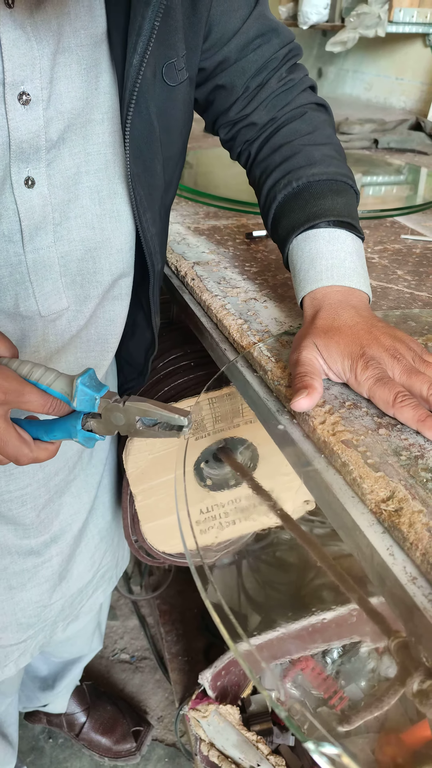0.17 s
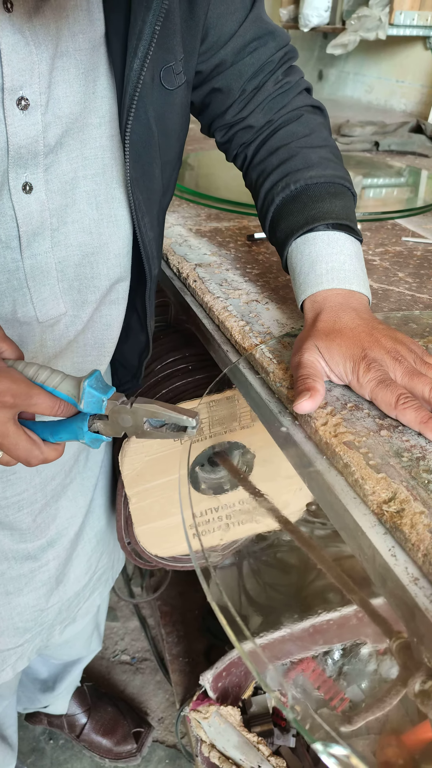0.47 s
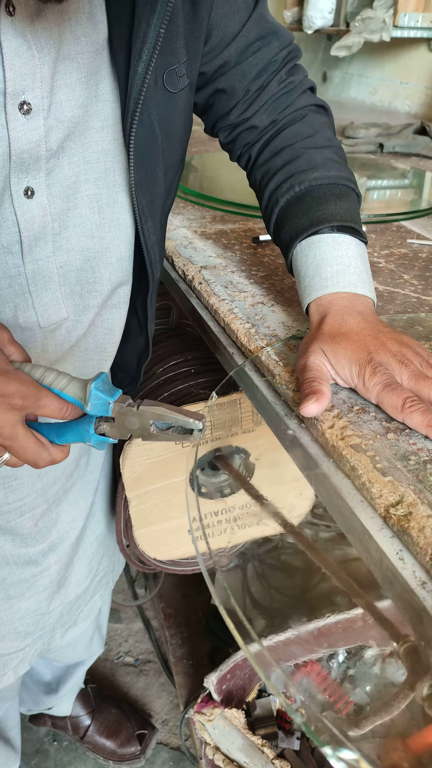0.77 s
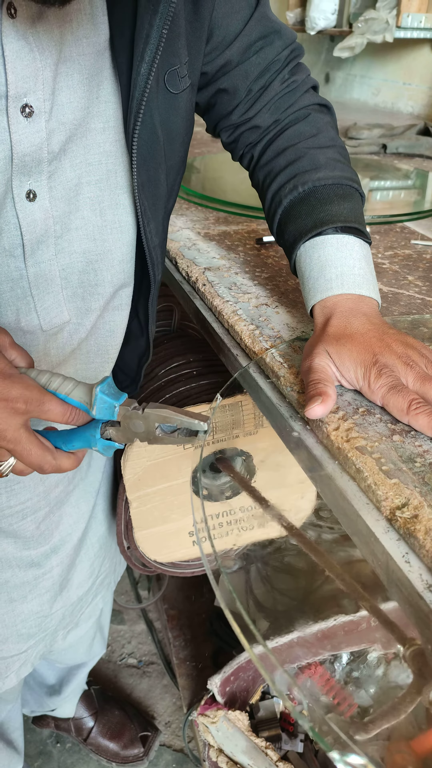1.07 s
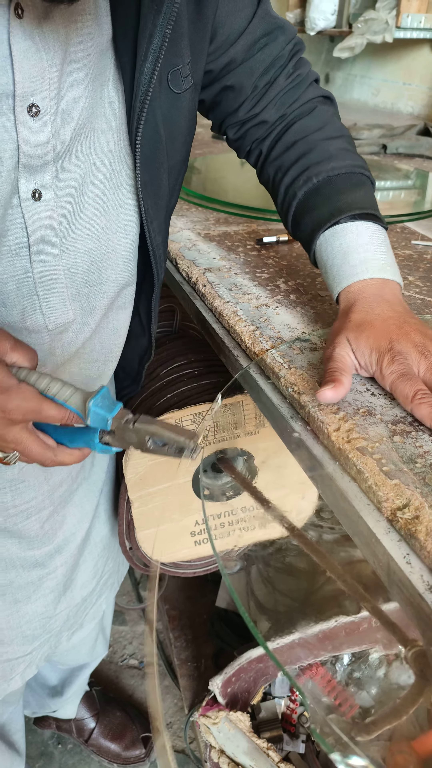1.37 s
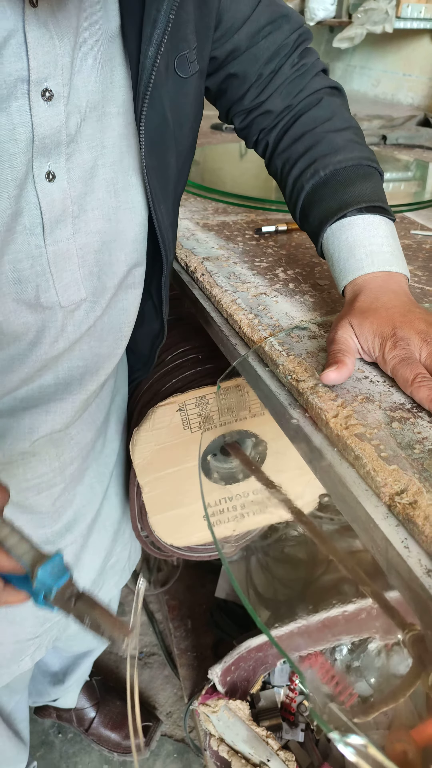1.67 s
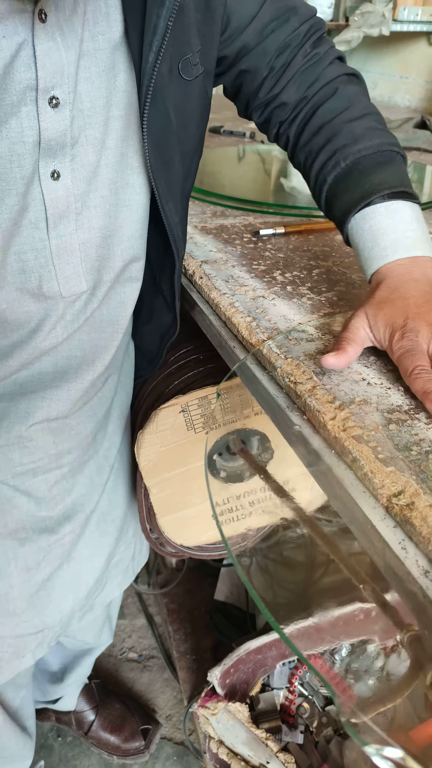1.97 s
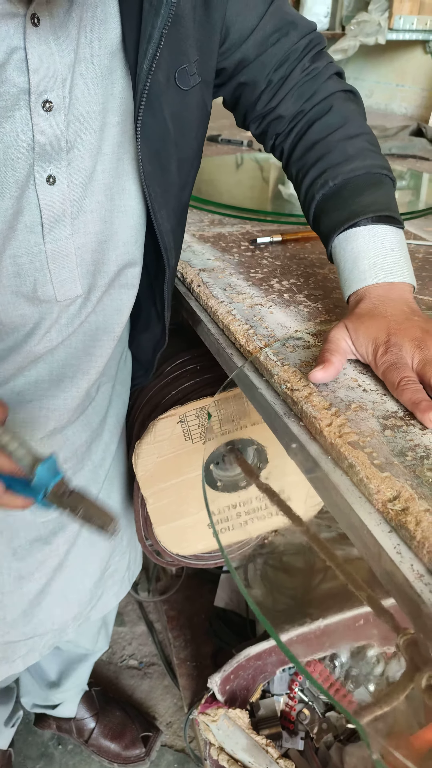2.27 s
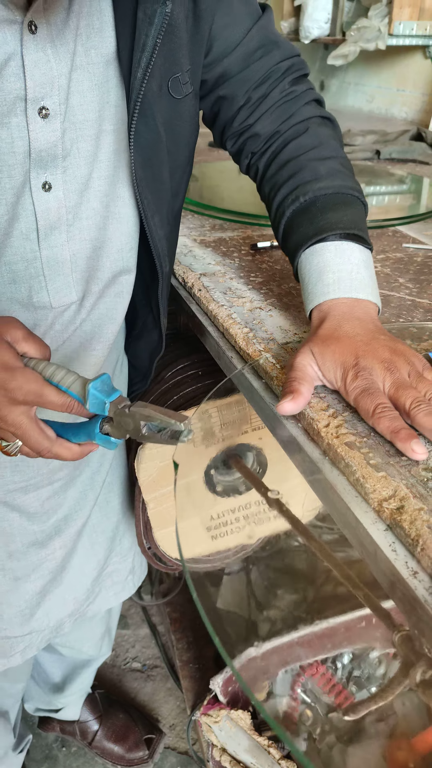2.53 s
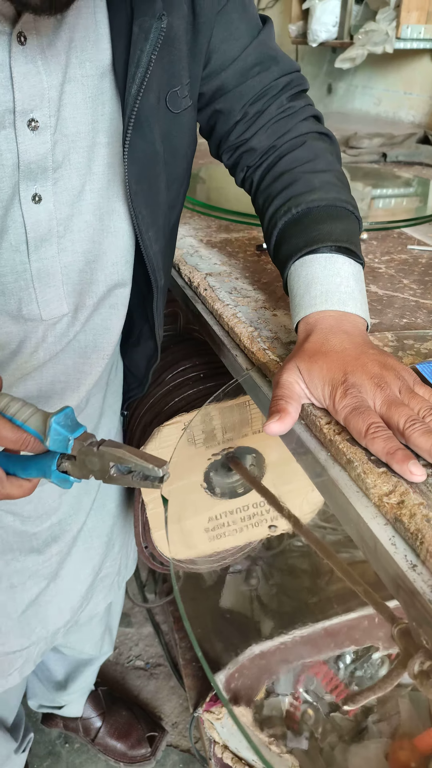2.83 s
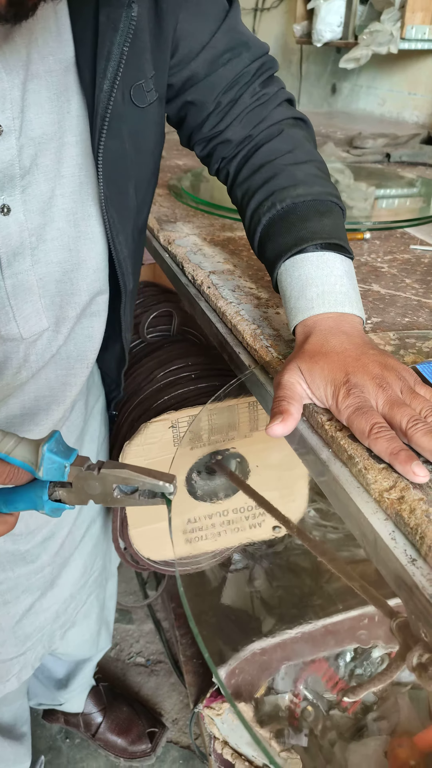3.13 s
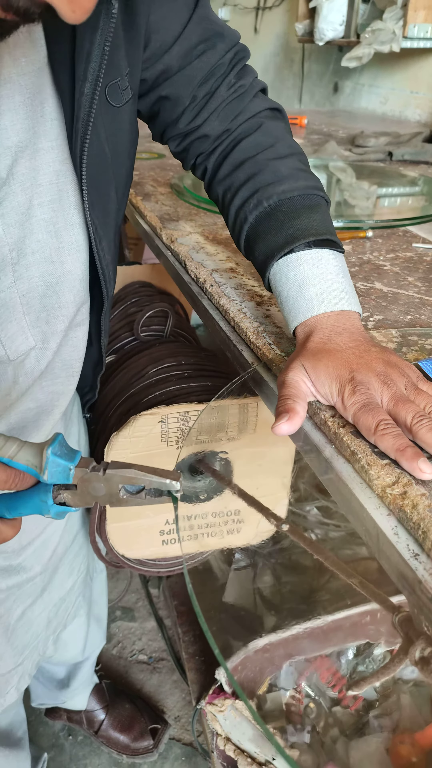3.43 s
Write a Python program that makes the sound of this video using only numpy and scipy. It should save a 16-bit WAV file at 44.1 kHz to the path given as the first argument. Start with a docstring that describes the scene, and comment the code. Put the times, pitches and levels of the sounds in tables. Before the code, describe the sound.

A glass sheet cracks loudly under pliers, and the broken strip falls and clinks ringing nearby

```python
"""Snapping a strip off a glass sheet

Pliers tick on the edge of a glass sheet and snap a long strip off with a crack: bursts of gritty noise.
The strip falls to the right and clinks on a hard floor: ringing modes, struck at each touch of the floor.
The pliers bite the edge again. Echoes of noise make the open workshop; street rumble, hiss and a drone
fill it. A gain control turns the sound down after loud blows."""
import sys
import numpy as np
from scipy import signal
from scipy.fft import rfft, irfft, next_fast_len
from scipy.io import wavfile
from scipy.ndimage import uniform_filter1d, map_coordinates

SR = 44100
rng = np.random.default_rng(int(sys.argv[2]) if len(sys.argv) > 2 else 0)


def wrap_up_sound(samples):
    """Save the sound to the file named by the first command line argument, as 16-bit audio."""
    columns = np.atleast_2d(samples).T
    # keep every value between -1 and 1, then stretch to whole-number steps
    tamed = np.clip(columns, -1, 1)
    steps = np.round(tamed * 32767).astype(np.int16)
    wavfile.write(sys.argv[1], SR, steps)


N = 158760
RISE_S = 0.0013  # how fast a blow swells

# Pitches of the strip's modes: (frequency [Hz])
STRIP_MODES_HZ = [1465, 2875, 4690, 6870, 9405, 12240, 12530, 3698, 5525, 6430, 7660, 10170, 11350, 13070]


def amp(db):
    """Turn decibels into a plain factor."""
    return 10 ** (np.asarray(db) / 20)


def unit(x):
    """Scale to an rms of 1."""
    return x / np.sqrt(np.mean(x ** 2) + 1e-20)


def along(points, hz):
    """Read a curve of (frequency [Hz], value) points on a log frequency axis."""
    f, v = np.transpose(points)
    return np.interp(np.log(hz + 1), np.log(f + 1), v)


def wobble(rate, count=N):
    """A smooth random curve through `rate` random points a second."""
    knots = rng.standard_normal(int(count * rate / SR) + 4)
    return map_coordinates(knots, [np.arange(count) * rate / SR])


def filtered(x, response):
    """Multiply the spectrum of x by a response that depends on frequency."""
    m = next_fast_len(N + SR // 2)
    hz = np.fft.rfftfreq(m, 1 / SR)
    return irfft(rfft(x, m) * response(hz), m)[..., :N]


def rush(spectrum, alike):
    """Stereo noise of rms 1; a shared middle and an opposed side part set how alike left and right are."""
    def response(hz):
        turn = np.arccos(np.clip(along(alike, hz), -1, 1)) / 2
        return amp(along(spectrum, hz)) * [np.cos(turn), np.sin(turn)]

    mid, side = filtered(rng.standard_normal((2, N)), response)
    return unit(np.array([mid + side, mid - side]))


def split(x):
    """Low and high part, parted softly around 5970 Hz; together they give x again."""
    low = filtered(x, lambda hz: 1 / (1 + (hz / 5970) ** 4))
    return low, x - low


def burst(s, t60):
    """Envelope of a blow at s seconds: a quick rise, then a fall of 60 dB in t60 seconds."""
    u = np.maximum(np.arange(N) / SR - s, 0)
    return (1 - np.exp(-u / RISE_S)) * amp(-60 * u / t60)


def modes(x, centres_hz, width_hz):
    """x ringing in narrow resonances, added with alternating sign."""
    def response(f):
        total = 0
        for k, hz in enumerate(centres_hz):
            total = total + (-1) ** k * 1j * f * width_hz / (hz * hz - f * f + 1j * f * width_hz)
        return total

    return filtered(x, response)


def pings(rows, t60):
    """One dying sine tone for each (time [s], level [dB], frequency [Hz]) row."""
    t = np.arange(N) / SR
    return sum(amp(db) * burst(s, t60) * np.sin(2 * np.pi * hz * (t - s)) for s, db, hz in rows)


def pliers():
    """Glass breaks in many tiny steps: patchy, gritty noise is opened by each tick, crack and scrape."""
    # Cracks and ticks: (time [s], level [dB], treble lift before scaling [dB])
    ticks = [(0.0215, -30, -18), (0.068, -39, 6), (0.0904, -34.5, -3), (0.1404, -39.5, -3),
             (0.2173, -38.5, -4), (0.5888, -35.5, 19.5), (0.607, -51, 28), (0.7995, -40, 11.5),
             (0.854, -1.5, 0.5), (0.893, -32, -2), (0.95, -26.5, -14), (1.067, -27.5, -20),
             (1.0902, -35, -2.5), (1.135, -42, -1), (1.158, -28.5, 2.5), (1.1872, -37, -6),
             (1.248, -51, 20), (1.3013, -56.5, 24), (1.3428, -54.5, 16), (1.4613, -23.5, -6),
             (1.486, -28.5, -3), (1.5023, -31, 7.5), (1.642, -54, 20), (1.6766, -49, 4),
             (1.7435, -51, 11.5), (1.9856, -41, -6), (2.575, -12.5, -15), (3.24, -40, 21),
             (3.359, -37, 11.5)]
    # Scrapes of the jaws and glass crumbs: (start [s], length [s], level [dB], treble lift before scaling [dB])
    scrapes = [(0.939, 0.095, -46.5, -9), (1.004, 0.13, -50, -10), (1.149, 0.08, -48.5, -1.5),
               (1.473, 0.022, -49.5, 8), (2.041, 0.089, -57.5, 7.5), (2.42, 0.065, -41.5, -1.5),
               (2.822, 0.033, -55, 3), (2.989, 0.086, -49, -6.5), (3.246, 0.05, -61, 17),
               (3.359, 0.031, -61, 15)]
    # Colour of a crack: (frequency [Hz], relative level per Hz [dB])
    sheet_colour = [(650, -33), (1100, -8), (1450, -9), (2200, 1), (3400, -0.5), (5660, -3.5), (7470, -6),
                    (11900, -20), (14200, -13.5), (14900, -45)]
    left_right_alike = 0.19
    patchy_db, grit_db, crumb_db = 4, 4, 4  # strength of the random level changes
    tick_t60_s, longer = 0.024, 0.055  # t60 of a tick at 0 dB; dB of length per dB of level
    shiver_db, shiver_t60_s = -23.5, 0.056  # faint crackle after a tick
    treble_scale = 0.77

    # Short patches of time and pitch are louder or softer at random.
    z = signal.stft(rush(sheet_colour, [(500, left_right_alike)]), nperseg=192)[2]
    patches = uniform_filter1d(rng.standard_normal(z.shape[1:]), size=3, axis=1)
    grit = signal.istft(z * amp(patchy_db * unit(patches)), nperseg=192)[1][:, :N]
    low, high = split(unit(grit * amp(grit_db * wobble(900))))

    shapes = []
    for s, db, treble in ticks:
        snap = burst(s, tick_t60_s * amp(longer * db))
        shiver = amp(shiver_db) * burst(s, shiver_t60_s)
        shapes.append((amp(db - 1) * (snap + shiver), treble))
    t = np.arange(N) / SR
    crumbs_db = crumb_db * wobble(220)
    for s, length, db, treble in scrapes:
        progress = np.clip((t - s) / length, 0, 1)
        hump = np.sin(np.pi * progress ** 0.86) ** 0.91
        shapes.append((amp(db + crumbs_db) * hump, treble))

    def envelope(lift):
        """Add the powers of all ticks and scrapes."""
        return np.sqrt(sum((env * amp(lift * treble)) ** 2 for env, treble in shapes))

    return low * envelope(0) + high * envelope(treble_scale)


def held(bites):
    """While the jaws hold the strip, their ticks wake its upper modes briefly."""
    from_s, to_s, level_db, width_hz = 0.9, 1.8, 12.5, 22
    t = np.arange(N) / SR
    upper_hz = [hz for hz in STRIP_MODES_HZ if hz > 7400]
    return amp(level_db) * modes(bites * ((t > from_s) & (t < to_s)), upper_hz, width_hz)


def pane(bites):
    """The sheet itself rings along with the pliers at its own pitches."""
    # Pitches of the sheet: (frequency [Hz])
    pane_hz = [2860, 4030, 4700, 5630, 6570, 8730, 14100]
    level_db, width_hz = 6, 40
    return amp(level_db) * modes(bites, pane_hz, width_hz)


def knocks():
    """Dull knocks: low tones that die quickly."""
    # Knocks: (time [s], level [dB], frequency [Hz])
    knock_rows = [(.854, -27.5, 985), (2.445, -35, 494), (2.576, -28.5, 986), (2.576, -35, 485)]
    return pings(knock_rows, t60=0.047)


def chips():
    """Loose chips of glass clink: short, higher tones."""
    # Chips: (time [s], level [dB], frequency [Hz])
    chip_rows = [(1.0675, -34, 2583), (1.094, -40, 4230), (1.1365, -42, 2170), (1.1595, -29.5, 4650)]
    return pings(chip_rows, t60=0.03)


def strip():
    """Each touch of the floor strikes the modes, and most also damp the old ringing; tumbling adds wavering."""
    # Modes of the strip: (level [dB], t60 [s], half waves along it [count], bends edgewise [0 to 1],
    # right over left [dB])
    mode_rows = [(-23.5, 0.81, 2.9, 0, 3), (-8.5, 0.84, 3.7, 0, 3.5), (9, 0.094, 3.8, 0, 11),
                 (7, 0.16, 5.84, 0, 24), (-6, 0.16, 5, 0, -2), (1.5, 0.14, 7.6, 0, 10),
                 (-15.5, 0.18, 5.7, 0, -6.5), (0, 0.83, 4.3, 1, 8.5), (7.5, 0.32, 5.2, 1, 6.5),
                 (-2, 0.41, 3.4, 0.017, 13), (7, 0.2, 4.9, 1, 1), (4, 0.12, 5.35, 1, 5),
                 (-4.5, 0.09, 8.5, 1, 11), (6.5, 0.099, 4.4, 1, 8.5)]
    # Touches of the floor: (time [s], flat modes [dB], edgewise modes [dB], place along the strip [0 to 1],
    # old ringing kept [dB, above 0 damps nothing], click [dB])
    touches = [(2.1072, -18, -27, .05, -20, -16), (2.14, -36, -32, .05, -6.5, -42),
               (2.1764, -24.5, -28.5, .095, 3.5, -19), (2.1959, -32, -25.5, 0.08, -31, -19.5),
               (2.205, -37, -46.5, 0.13, -13, -44), (2.344, -48, -36, .06, -1, -30.5),
               (2.413, -32.5, -29, .065, -4, -25), (2.43, -27, -29.5, 0.08, 6.5, -40),
               (2.493, -37, -38, 0.1, 4, -48), (2.578, -74, -60, 0.16, -32, -51),
               (2.673, -60, -43, 0.28, -7, -27), (2.706, -55.5, -50.5, .265, -25, -30.5)]
    # Even a mode struck at a still point sounds a little.
    node_leak, click_t60_s = 0.18, 0.022
    # Strengths of the random wavering: level, sound path and chatter; then points a second.
    wander_db, wander_m, buzz_db = 3, 0.011, -11
    wander_per_s, buzz_per_s = 60, 450

    hz = np.c_[STRIP_MODES_HZ]
    db, t60, waves, edge, lean_db = np.transpose(mode_rows)[..., None]
    start, stop = round(touches[0][0] * SR), round(touches[-1][0] * SR) + SR // 2
    t = np.arange(start, stop) / SR
    count = len(t)

    ring = np.zeros((len(mode_rows), count), complex)
    for s, flat_db, edge_db, place, kept_db, _ in touches:
        u = np.maximum(t - s, 0)
        rise = 1 - np.exp(-u / RISE_S)
        shape = np.abs(np.cos(np.pi * waves * place + np.pi / 4)) + node_leak
        phase = np.exp(2j * np.pi * rng.random(hz.shape))
        blow_db = np.where(edge > 0.5, edge_db, flat_db)
        new = shape * amp(db + blow_db - 60 * u / t60) * rise * phase
        ring = ring * amp(min(kept_db, 0) * rise) + new

    out = np.zeros((2, N))
    for ch, side in enumerate((-1, 1)):
        # Each mode wavers in level and in path length, differently on each side.
        level_wander = np.array([wobble(wander_per_s, count=count) for _ in mode_rows])
        path_wander = np.array([wobble(wander_per_s, count=count) for _ in mode_rows])
        late_s = wander_m / 343 * path_wander  # sound travels 343 m a second
        tone = np.exp(2j * np.pi * (hz * t + rng.random(hz.shape) + hz * late_s))
        chatter = np.array([wobble(buzz_per_s, count=count) for _ in mode_rows])  # on the floor
        tone *= 1 + amp(buzz_db) * chatter
        level = amp(wander_db * level_wander + lean_db * (side - 1) / 2)
        out[ch, start:stop] = np.sum(level * ring * tone, axis=0).real

    clicks = sum(amp(row[-1]) * burst(row[0], click_t60_s) for row in touches)
    click_colour = [(800, -6), (3000, 2.0), (8000, 6), (13500, -14.5), (15000, -31)]
    click_noise = rush(click_colour, [(500, 0.14)])
    return out + clicks * amp([[-6], [0]]) * click_noise  # 6 dB softer on the left


def room(x):
    """Nearby clutter gives a short dense echo, the shop a longer one that fades at its own speed per pitch."""
    # Echo of the shop: (frequency [Hz], t60 [s])
    shop_fade = [(500, .35), (2000, 0.31), (6000, 0.43), (14000, 0.16)]
    near_db, near_t60_s, shop_db = -9, 0.065, -11
    hop = int(0.3 * SR)  # a new random tail every 0.3 s
    delay = 150  # samples before the echo starts
    out = np.zeros((2, N + 2 * SR))
    for i in range(0, N, hop):
        hz, t, z = signal.stft(rng.standard_normal((2, SR // 2)), SR, nperseg=256)

        def fall(t60):
            """Longer fades start softer."""
            return amp(-60 * t / t60) / np.sqrt(t60)

        near = amp(near_db) * fall(near_t60_s)
        shop = amp(shop_db) * fall(along(shop_fade, hz)[:, None])
        tail = signal.istft(z * (near + shop), SR, nperseg=256)[1]
        wet = signal.fftconvolve(x[:, i:i + hop], tail * np.sqrt(14 / SR), axes=1)
        out[:, i + delay:i + delay + wet.shape[1]] += wet
    return out[:, :N]


def street():
    """Rumble and hiss are coloured noise; the fuzzy drone is a tone that wavers in level and phase."""
    # Slow course: (time [s], rumble [dB], hiss [dB], hiss treble [dB], drone pitch [Hz], drone [dB])
    course = [(0, -40.5, -53.5, -2, 124.8, -43.5), (.6, -40.5, -56.5, 7, 125.5, -40.5),
              (1.302, -42, -54, 6.5, 127.5, -54), (2.001, -41.5, -52.5, 6.5, 125.5, -40.5),
              (2.5, -41.5, -49.5, 8, 125.9, -57), (2.8, -40, -50.5, 10.5, 140.6, -43),
              (3.2, -39.5, -49, 9, 141.1, -47.5), (3.6, -40.5, -50, -0.5, 138, -56)]
    # Colour of the rumble: (frequency [Hz], relative level [dB])
    rumble_colour = [(12, -59), (20, -12), (59, -6.5), (86, -16), (106, -10), (129, -2.5), (188, -13),
                     (232, -22), (267, -13), (312, -12.5), (347, -21), (580, -53), (990, -120)]
    # Colour of the hiss: (frequency [Hz], relative level [dB])
    hiss_colour = [(240, -55.5), (400, -3), (1110, -11), (2380, -14), (4340, -26.5), (6410, -27),
                   (9460, -45.5), (10400, -43), (14400, -42)]
    # How alike left and right are: (frequency [Hz], likeness [-1 to 1])
    likeness = [(60, 0.96), (180, 0.98), (550, 0.64), (1650, -0.16), (4970, -0.089)]
    # Balance: (frequency [Hz], left over right [dB])
    balance = [(1000, .5), (6000, -1.5)]
    fuzz_per_s = 12  # random points a second

    s, *columns = np.transpose(course)
    curves = [np.interp(np.arange(N) / SR, s, column) for column in columns]
    rumble_db, hiss_db, treble_db, drone_hz, drone_db = curves

    low, high = split(rush(hiss_colour + [(14900, -93.0)], likeness))
    hiss_level = amp(hiss_db + 0.4 * wobble(6.13))
    hiss = hiss_level * (low + amp(treble_db + 1.6 * wobble(6)) * high)

    fuzz = 0.77 + 0.64 * (wobble(fuzz_per_s) + 1j * wobble(fuzz_per_s))
    tone = np.exp(2j * np.pi * np.cumsum(drone_hz) / SR)
    drone = amp(drone_db) * unit((fuzz * tone).real)

    rumble = amp(rumble_db + 0.34 * wobble(2.88)) * rush(rumble_colour, likeness)
    both = rumble + hiss + drone
    return filtered(both, lambda hz: amp(along(balance, hz) * [[0.5], [-0.5]]))


def scene():
    """Pliers and strip, their echo in the shop, and the street."""
    bites, clinks = pliers(), strip()
    bites = bites + held(bites) + pane(bites)
    bites = bites + knocks() + chips()
    echo = room(bites + amp(3) * clinks)  # the strip feeds the echo 3 dB more
    return bites + clinks + echo + street()


def record(dry):
    """Gain drops at once under loud blows and climbs back steadily; nothing is kept above the band limit."""
    duck_from_db, duck_slope, back_db_per_s = -24, 0.31, 28  # slope: dB of drop per dB too loud
    top_hz = 15770
    # Loudness over the latest 10 ms
    power = uniform_filter1d(np.mean(dry ** 2, axis=0), size=441, origin=220)
    loud_db = 10 * np.log10(np.abs(power) + 1e-12)
    climb_db = back_db_per_s * np.arange(N) / SR
    wanted_db = duck_slope * np.maximum(loud_db - duck_from_db, 0)
    # The deepest drop so far holds, less what has been climbed back since.
    duck_db = np.maximum.accumulate(wanted_db + climb_db) - climb_db
    return filtered(dry * amp(-duck_db), lambda hz: hz < top_hz)


dry = scene()
out = record(dry)
wrap_up_sound(out)
```